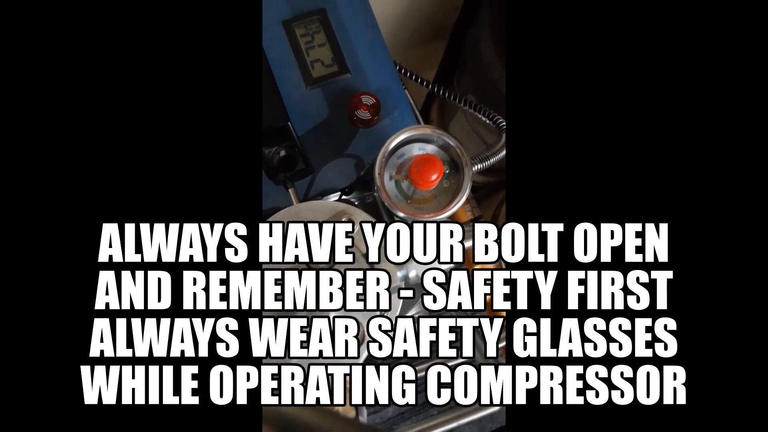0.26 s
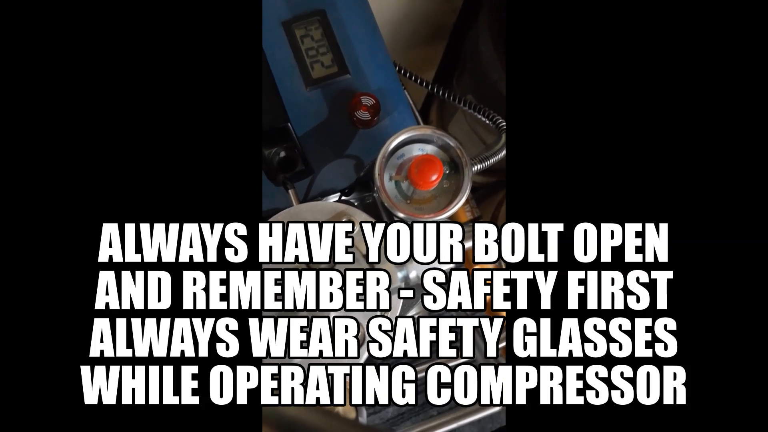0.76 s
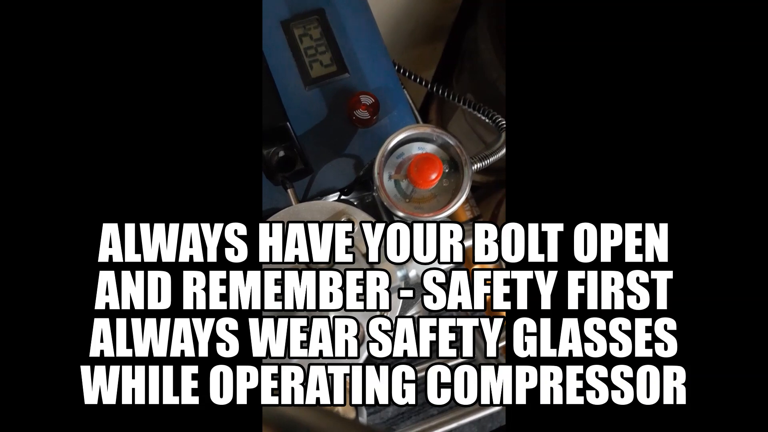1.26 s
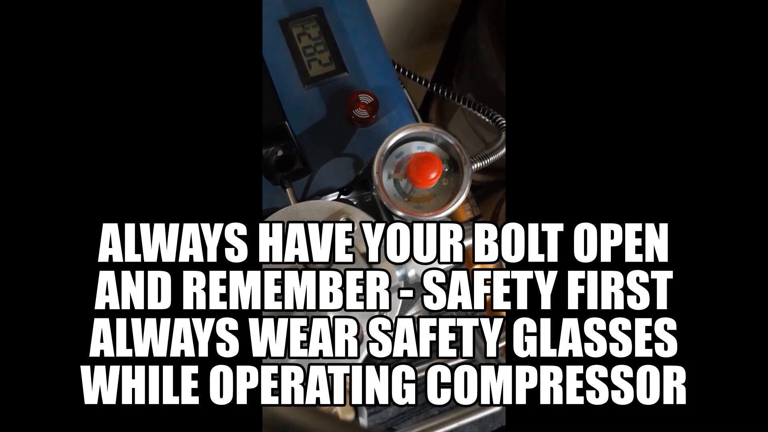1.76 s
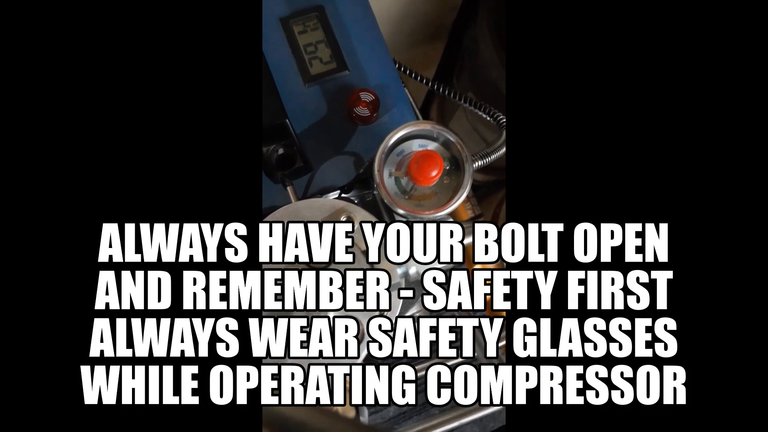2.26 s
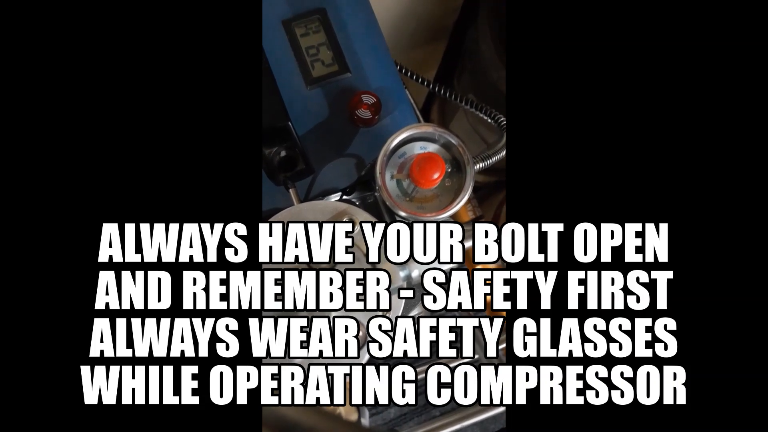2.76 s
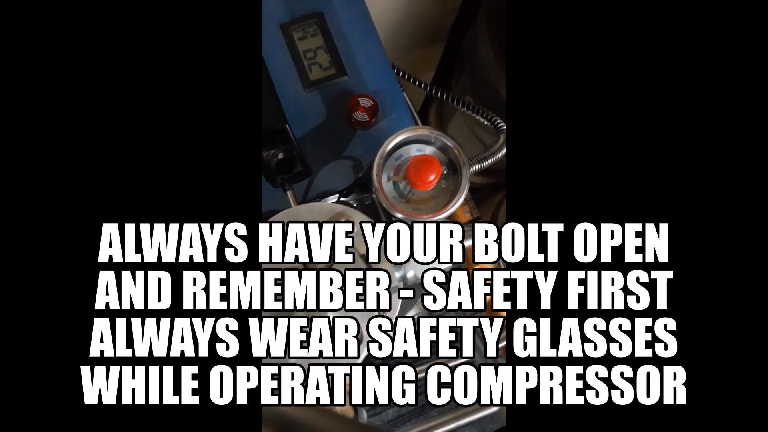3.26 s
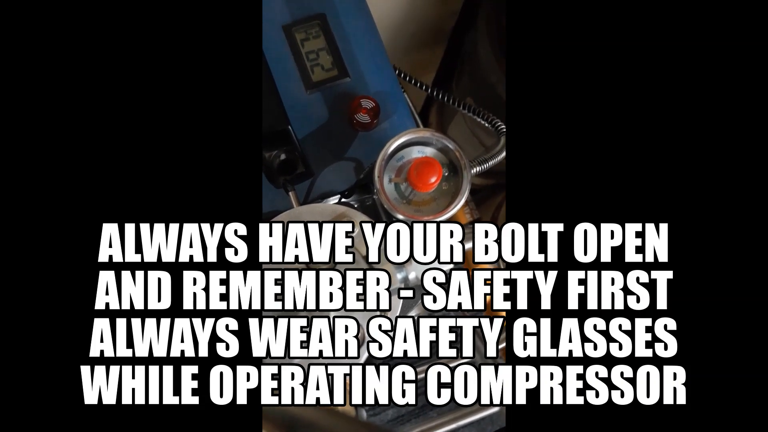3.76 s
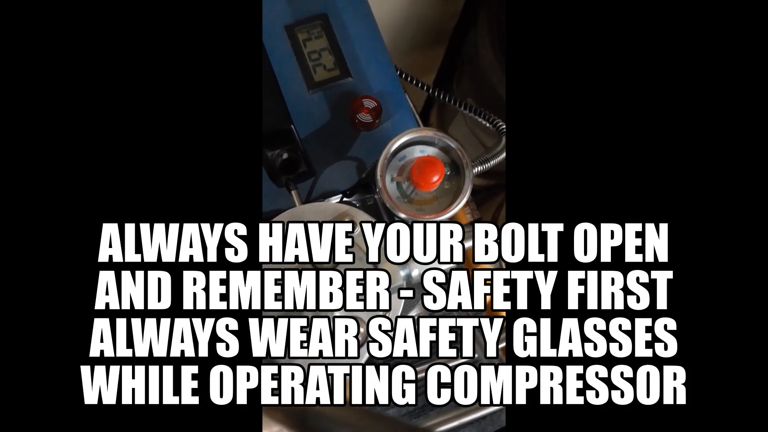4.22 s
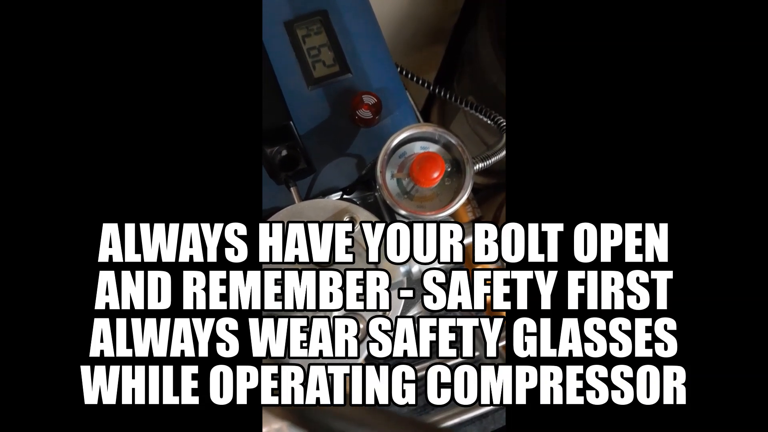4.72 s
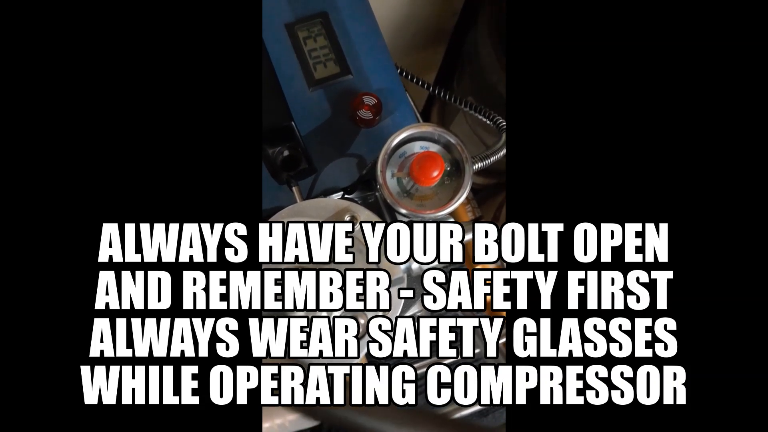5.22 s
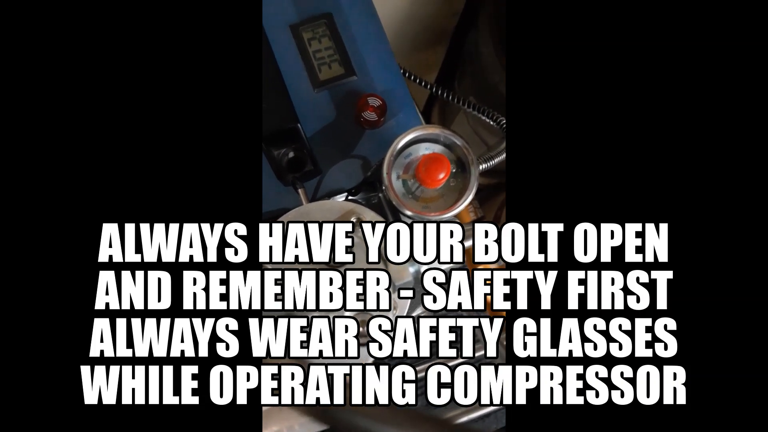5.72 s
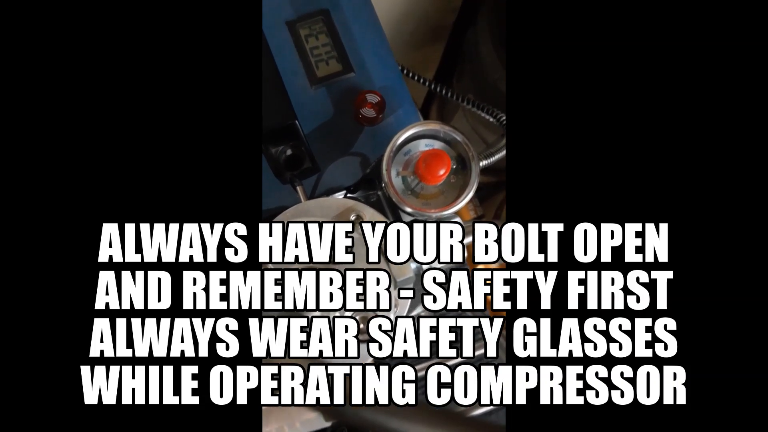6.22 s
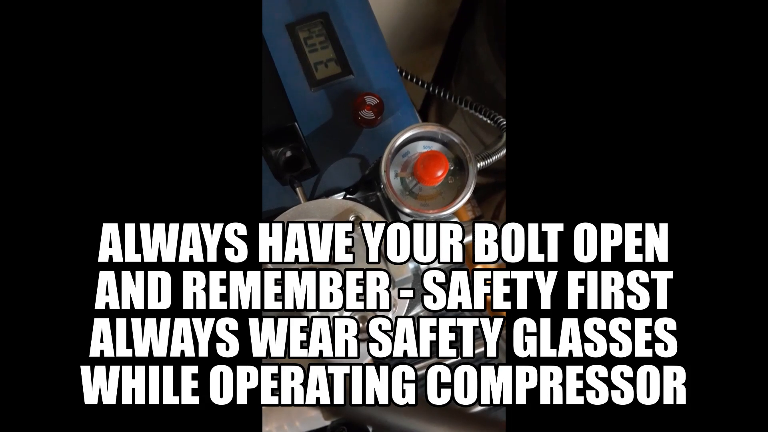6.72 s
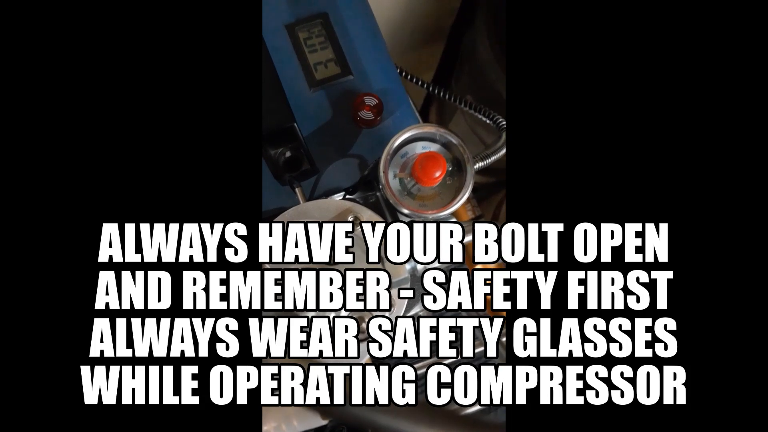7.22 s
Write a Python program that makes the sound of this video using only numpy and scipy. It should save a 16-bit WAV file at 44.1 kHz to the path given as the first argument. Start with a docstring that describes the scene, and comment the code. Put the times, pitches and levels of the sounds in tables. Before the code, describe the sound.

A small piston compressor is filling an airgun indoors, heard from just above the machine. It is already running at 0 seconds and continues without a break until about 7.5 seconds. Hard, even knocks, around 56 a second, ring the metal body and merge into a buzzing clatter. Under them is a strong, steady hum at a low to middle pitch, with a deeper drone from the pumping. Each stroke brings two tiny spits of air from the valves and a very high, thin ping, which together form a fine, pulsing sizzle. A cooling fan adds a softer rush of air with a faint breathy whistle. Over the whole stretch the motor slows very slightly and the knocking gains a little weight. From about 5 seconds the hum swells gently, and the machine is still running at the end.

```python
"""A fast, hard knocking over a strong hum: a small piston compressor is filling an airgun indoors.
Each turn of the crank gives a knock that rings the metal body, a high ping from a valve plate
and two spits of air through the valves. The hum is a resonance at six times the crank's rate.
Cooling air rushes on behind it all, and the motor slows a little as the pressure builds."""
import sys
import numpy as np
from scipy import signal
from scipy.fft import rfft, irfft, next_fast_len
from scipy.io import wavfile
from scipy.ndimage import uniform_filter1d

SR = 44100
rng = np.random.default_rng(int(sys.argv[2]) if len(sys.argv) > 2 else 0)


def store_pcm(level_fs):
    """Save levels as 16-bit WAV."""
    pcm = np.round(np.clip(level_fs, -1, 1) * 32767).astype(np.int16)
    wavfile.write(sys.argv[1], SR, np.atleast_2d(pcm).T)


N = 329862
TIME = np.arange(N) / SR
FREQS = np.fft.rfftfreq(next_fast_len(N, real=True), 1 / SR)
SIDE = np.array([[.5], [-.5]])  # splits a left-minus-right difference between the two channels

# how the machine shades each side from the air noise (frequency [Hz], left minus right [dB])
AIR_SHADE = [(100, 0), (330, -1), (650, 2), (1100, 2), (2200, 0), (3100, -6), (4500, -2), (6500, 1),
             (8500, 6), (12300, 2), (15000, 0)]
# tone colour of the cooling air (frequency [Hz], level [dB])
FAN_RUSH = [(20, -87), (100, -65.5), (230, -68.5), (335, -53), (430, -63.5), (880, -65.5), (1020, -65.5),
            (1400, -63), (1850, -62), (2150, -64), (2400, -62.5), (2650, -68), (3500, -69.5), (5500, -78.5),
            (13000, -84.5), (15000, -86)]
# low tones of the pressure pulse (multiple of the crank rate, left level [dB], right level [dB])
PULSE_TONES = [(1, -49, -67), (2, -28.5, -30), (3, -34, -34), (4, -45, -35), (5, -52, -29.5),
               (7, -44.5, -26.5), (8, -36.5, -50), (9, -31, -41.5), (10, -38, -33.5), (11, -56, -32.5),
               (12, -30.5, -35), (13, -38, -39), (14, -47.5, -33)]
# tone colour of the air in the valves (frequency [Hz], level [dB])
VALVE_HISS = [(1500, -71), (3400, -69.5), (5500, -74.5), (6500, -70.5), (7250, -75.5), (8300, -74),
              (9700, -80.5), (11400, -76.5), (12400, -72.5), (13400, -75), (14800, -90)]
# spits of air in one turn (place after the knock [turns], rise [turns], decay [turns], level [dB])
AIR_SPITS = [(0.768, 0.026, 0.12, 7.5), (.005, 0.064, 0.089, 6.5)]
# the valve plate's ring, fading unevenly as the pressure builds (time [s], level [dB])
PLATE_FADE = [(1.0, -22.5), (2.5, -25.5), (3.6, -24), (6.0, -25), (7.48, -29)]
# ringing tones of the cylinder, pipes and housing
# (frequency [Hz], half width [Hz], left level [dB], right level [dB])
BODY_MODES = [(870.3, 41, -31.5, -40), (1146, 33.8, -31.5, -39), (1282, 150, -82, -39.5),
              (1361, 65, -62, -33), (1558, 10.7, -54, -28), (1625, 64, -32.5, -45), (1762, 136, -31.5, -39),
              (1896, 66, -43, -33), (1950, 25, -53, -63), (2327, 60, -54, -34), (2464, 80, -41, -36),
              (2682, 64, -51.5, -37.5), (2855, 25, -61, -37), (3056, 270, -73, -41.5),
              (3470, 72, -53.5, -44), (3773, 82, -48, -41.5), (4620, 760, -58, -53), (6100, 310, -65, -59),
              (8400, 750, -68, -76), (10540, 440, -58, -75), (12600, 730, -57.5, -69)]
# blows in one turn: the piston's knock, its return and a valve's tick (place [turns], level [dB])
TURN_BLOWS = [(0, -1), (.446, -16), (.777, -16.5)]


def undb(db):
    """Turn decibels into a gain to multiply by."""
    return 10 ** (np.asarray(db) / 20)


def wander(rate_hz):
    """A smooth random wobble, about 1 in size, that picks rate_hz new values a second."""
    hold = int(SR / rate_hz)
    steps = np.repeat(rng.standard_normal(N // hold + 1), hold)
    return np.sqrt(2) * uniform_filter1d(uniform_filter1d(steps, hold), hold)[:N]


def shape(sound, gain):
    """Filter a sound by giving each frequency its own gain."""
    size = next_fast_len(N, real=True)
    return irfft(rfft(sound, size) * gain, size)[..., :N]


def air_colour(rows):
    """Turn (Hz, dB) rows into left and right filter gains, shaded by the machine."""
    def curve(table):
        hz, db = np.transpose(table)
        return np.interp(np.log(FREQS + 1), np.log(hz), db)
    return undb(curve(rows) + SIDE * curve(AIR_SHADE))


def noise(alike_below_hz):
    """White noise whose left and right sides are alike in the bass and unrelated in the treble."""
    likeness = 1 / (1 + (FREQS / alike_below_hz) ** 2)
    shared, apart = shape(rng.standard_normal((2, N)), np.sqrt([1 + likeness, 1 - likeness]))
    return np.array([shared + apart, shared - apart]) * np.sqrt(SR) / 2


def crank_speed(empty_hz=56.0895, full_loss_hz=.5025, fill_s=12):
    """Turns per second: the pressure builds ever more slowly and drags the crank down."""
    pressure = 1 - np.exp(-TIME / fill_s)
    return empty_hz - full_loss_hz * pressure


def cooling_air(flutter_db=1.1, whistle_hz=2815, whistle_width_hz=35, whistle_db=(-64, -58)):
    """The fan blows a fluttering rush of air with a thin, breathy whistle in it."""
    whistle = undb(whistle_db)[:, None] / (1 + ((FREQS - whistle_hz) / whistle_width_hz) ** 2)
    rush = noise(780) * undb(flutter_db * wander(150))
    return shape(rush, np.hypot(air_colour(FAN_RUSH), whistle))


def pumping(turn, growth_db=.6, level_db=-2, phase_rad=-2.63, lead_turns=.024):
    """Each stroke sends out a pressure pulse, which slowly grows a little stronger."""
    angle = 2 * np.pi * (turn + lead_turns)
    pulse = sum(undb(db)[:, None] * np.cos(multiple * angle + phase_rad) for multiple, *db in PULSE_TONES)
    return np.sqrt(2) * pulse * undb(level_db + growth_db * np.linspace(-1, 1, N))


def hum(turn, multiple=6, level_db=-13.5, swell_db=1.5, waver_db=.08, pan_db=-2.6, left_lead_rad=1):
    """The crank's sixth harmonic meets a resonance; its standing wave reaches each side out of step."""
    swell = swell_db * (TIME / TIME[-1]) ** 3.6  # nearly flat at first, rising toward the end
    gain = undb(level_db + swell + waver_db * wander(7.5) + pan_db * SIDE)
    angle = 2 * np.pi * multiple * turn + .85 + left_lead_rad * SIDE
    return np.sqrt(2) * gain * np.cos(angle)


def valve_spits(turn, level_db=-3, scatter_db=.9):
    """Air spits through the valves twice a turn, each spit with its own strength."""
    power = 0
    for place, rise, decay, db in AIR_SPITS:
        since = (turn - place + .25) % 1 - .25  # turns since the peak; negative while opening
        opening = np.where(since < 0, np.exp(-(since / rise) ** 2), np.exp(-since / decay))
        power = power + (opening * undb(db + scatter_db * wander(110))) ** 2
    return shape(noise(500) * np.sqrt(power), air_colour(VALVE_HISS)) * undb(level_db)


def valve_plate(turn, pitch_hz=12310, rise_s=.00052, decay_s=.0016, pan_db=3, left_lead_rad=1,
                seating_rad=1.4, scatter_db=1.1, room_db=-51, room_width_hz=170):
    """A thin plate slaps shut with each knock and rings high, a little differently every time."""
    slap = (turn + 1).astype(int)
    since_s = turn % 1 / crank_speed()
    seating, force = rng.standard_normal((slap[-1] + 1, 2))[slap].T
    attack = 1 - np.exp(-(since_s / rise_s) ** 2)
    envelope = attack * np.exp(-since_s / decay_s) * undb(scatter_db * force)
    phase = seating_rad * seating + left_lead_rad * SIDE
    tone = np.sqrt(2) * np.sin(2 * np.pi * pitch_hz * since_s + phase)
    # a narrow band of noise stands for the room holding the ring
    room = shape(noise(500), undb(room_db) / (1 + ((FREQS - pitch_hz) / room_width_hz) ** 2))
    fade_db = np.interp(TIME, *np.transpose(PLATE_FADE))
    return (envelope * tone + room) * undb(fade_db + pan_db * SIDE)


def body_ring(size=8192):
    """How the metal body rings after a single blow, on the left and on the right."""
    hz, width, *levels_db = np.transpose(BODY_MODES)
    freqs = np.fft.rfftfreq(size, 1 / SR)
    peaks = (1 + ((freqs - hz[:, None]) / width[:, None]) ** 2) ** -2
    power = undb(levels_db) ** 2 @ peaks
    # keep this tone colour, but let all the ringing come after the blow (minimum phase)
    cepstrum = irfft(np.log(power))
    cepstrum[:, 0] /= 2
    cepstrum[:, size // 2:] = 0
    return irfft(np.exp(rfft(cepstrum)))[:, :size // 2]


def tone_drift(knock, thud_top_hz=1000, thud_gain_db=3.5, ring_top_hz=2300, ring_loss_db=1.1):
    """From start to end, the knock slowly gains low thud and loses middle ring; its crack stays."""
    progress = TIME / TIME[-1] - .5
    thud = shape(knock, 1 / (1 + (FREQS / thud_top_hz) ** 10))
    thud_and_ring = shape(knock, 1 / (1 + (FREQS / ring_top_hz) ** 10))
    ring, crack = thud_and_ring - thud, knock - thud_and_ring
    return thud * undb(thud_gain_db * progress) + ring * undb(-ring_loss_db * progress) + crack


def piston_knocks(turn, jitter_s=1.2e-5, scatter_db=.5, level_db=.43, seated_s=.9, loose_lag_s=5e-5):
    """Piston and valve strike nearly the same way in each turn, and the metal body rings."""
    turns = int(turn[-1]) + 1
    place, db = np.transpose(TURN_BLOWS)
    blow_turn = (np.arange(turns)[:, None] + place).ravel()
    timing, strength = rng.standard_normal((len(blow_turn), 2)).T
    blow_sample = np.interp(blow_turn, turn, np.arange(N), right=N + SR) + jitter_s * SR * timing
    # until the first pressure seats the piston, the blows land late by a random lag
    loose = blow_sample < seated_s * SR
    blow_sample += loose * loose_lag_s * SR * rng.exponential(size=len(blow_turn))
    # each blow is a short click (a windowed sinc) that can fall between samples
    taps = blow_sample.astype(int)[:, None] + np.arange(-7, 9)
    offset = taps - blow_sample[:, None]
    clicks = np.sinc(offset) * np.sinc(offset / 8)
    force = undb(level_db + np.tile(db, turns) + scatter_db * strength) * N / turns / np.sqrt(2)
    blows = np.bincount(np.maximum(taps, 0).ravel(), (clicks * force[:, None]).ravel(), N)[:N]
    return signal.fftconvolve(blows[None], body_ring(), axes=1)[:, :N]


def scene(left_lead_s=4e-5, treble_hz=9150, treble_db=2):
    """One crank times the knocks, valves, pressure pulse and hum, over the rush of the fan."""
    turn = -.084 + np.cumsum(crank_speed()) / SR  # turns so far, starting just before a knock
    knocks = tone_drift(piston_knocks(turn))
    # the cylinder sits a little to the left, so its knocks arrive there first
    knocks = shape(knocks, np.exp(2j * np.pi * FREQS * SIDE * left_lead_s))
    treble_lift = 1 + (undb(treble_db) - 1) / (1 + (treble_hz / (FREQS + 1)) ** 4)
    machine = shape(knocks + valve_spits(turn) + cooling_air(), treble_lift)
    return machine + valve_plate(turn) + pumping(turn) + hum(turn)


def record(dry, top_hz=15650):
    """The phone just above the machine cuts off the highest treble."""
    return signal.sosfilt(signal.ellip(10, .2, 80, top_hz, fs=SR, output="sos"), dry)


dry = scene()
out = record(dry)
store_pcm(out)
```